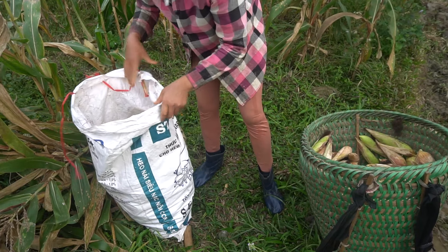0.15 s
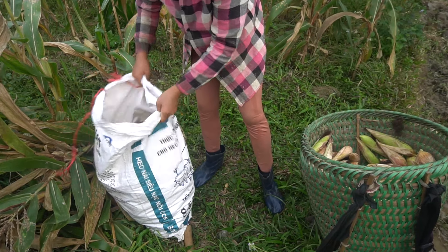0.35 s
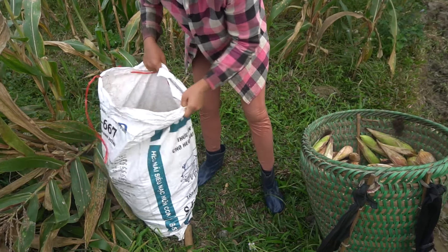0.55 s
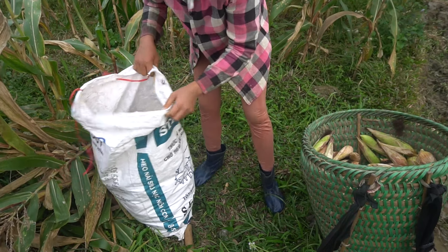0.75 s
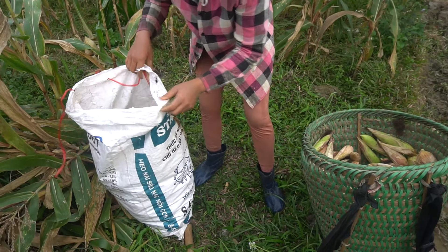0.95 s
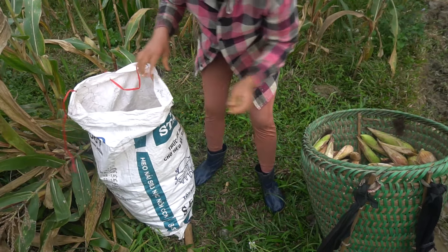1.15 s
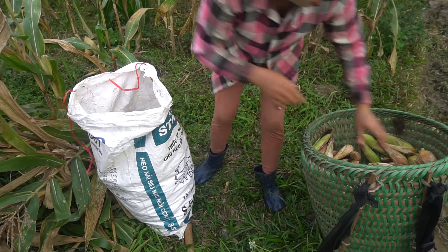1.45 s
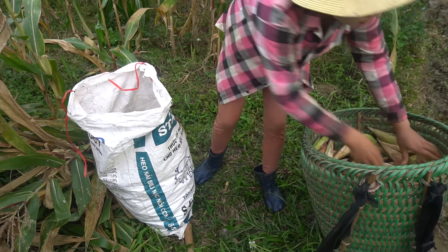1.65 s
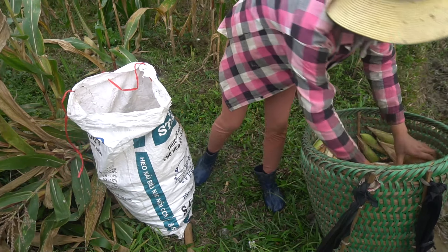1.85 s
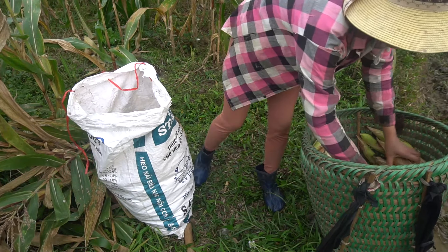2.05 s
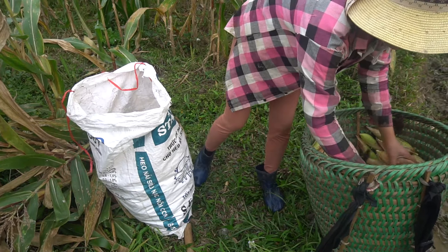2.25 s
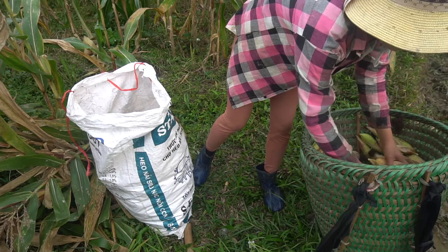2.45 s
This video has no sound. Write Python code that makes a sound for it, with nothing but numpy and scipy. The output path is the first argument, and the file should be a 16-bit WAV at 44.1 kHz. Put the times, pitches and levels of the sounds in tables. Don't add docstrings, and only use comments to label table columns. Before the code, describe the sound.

Crackling of a full woven plastic sack jerked by hands, then corn husks rummaged in a basket

```python
import sys
import numpy as np
from scipy import signal
from scipy.fft import rfft, irfft
from scipy.io import wavfile
from scipy.ndimage import uniform_filter1d

SR = 44100
rng = np.random.default_rng(int(sys.argv[2]) if len(sys.argv) > 2 else 0)


def undo_db(level):
    steps = np.asarray(level, float) / 20
    return 10 ** steps


def file_out(sig):
    cols = np.atleast_2d(sig).T
    lim = np.clip(cols, -1, 1)
    pcm = np.round(lim * 32767).astype(np.int16)
    wavfile.write(sys.argv[1], SR, pcm)


N = 114660

# (peak [s], length [s], weave [dB], walls [dB rel. weave], fizz [dB rel. weave])
TUGS = [(.0, 0.12, -46, 2, 3.5), (0.164, 0.16, -46, -4.5, 1), (0.236, 0.095, -54, -27, 3),
        (0.293, 0.097, -44, -5, -3), (0.335, 0.039, -48.5, -2, 3), (0.399, 0.12, -36, -2, -3),
        (0.437, 0.033, -33, -1, -18), (0.453, 0.093, -26, -14, -28), (0.458, 0.092, -30.5, 3.5, 0.5),
        (0.494, 0.03, -39, 10.5, 4), (0.591, 0.097, -46.5, -6.5, -3.5), (0.65, 0.15, -47, -0.5, 2),
        (0.757, 0.24, -48, -2, 4.5), (0.818, 0.054, -41.5, -8, -3), (0.858, 0.1, -49.5, 2, -16),
        (0.983, 0.073, -60.5, 4.5, 13.5), (1.013, 0.039, -43.5, -6, -3), (1.056, 0.14, -53.5, -9, 2.5),
        (1.141, 0.041, -50, -6.5, 3.5), (1.173, 0.021, -45, -9, -4)]
# (peak [s], length [s], husks [dB], fizz [dB rel. husks])
GRABS = [(1.72, 0.37, -70, 11), (1.803, 0.029, -50.5, -1.5), (1.87, 0.13, -51, 1.5),
         (1.908, 0.037, -47, -10), (1.952, 0.21, -49.5, 1.5), (2.014, 0.095, -42.5, 3.5),
         (2.083, 0.053, -44.5, -0.5), (2.113, 0.14, -49.5, 2), (2.272, 0.15, -47, -1.5),
         (2.336, 0.03, -37, 5.5), (2.343, 0.16, -43.5, -2), (2.402, 0.08, -48.5, 2.5),
         (2.436, 0.063, -48.5, 6), (2.5, 0.32, -54.5, -1.5), (2.595, 0.083, -47.5, 4.5)]
# (time [s], peak [dB], ring [Hz], share of sharp tick [0-1])
SNAPS = [(0.3004, -24.5, 2070, 0), (0.3301, -37.5, 1770, 0), (.3815, -31, 700, 0.3),
         (.3903, -36, 5000, 0.5), (0.3998, -15, 4740, 0.7), (.4075, -25, 920, 0.15),
         (0.422, -10, 1800, 0.37), (0.422, -12, 2900, 0.15), (.4318, -18, 1890, 0.4),
         (.4385, -13, 1920, .4), (0.4435, -9, 1110, 0.47), (.4535, -15, 8500, 0.1),
         (0.4572, -22.5, 1090, 1), (.4608, -10, 895, 0.25), (.4633, -11.5, 787, 0.3),
         (.4665, -25, 7700, .2), (.4712, -18, 1380, .15), (0.4726, -11.5, 7640, 0.06),
         (.4745, -18, 790, 0.78), (.48, -19, 690, 0.5), (.4834, -19, 700, 0.35), (.488, -17, 7800, 0),
         (.4995, -21, 11000, .3), (.5022, -27, 4020, 0.7), (0.5702, -31, 2660, 0.7), (.5955, -31, 1810, .3),
         (.626, -29.5, 2410, 0.2), (.654, -39, 5000, 0.8), (.7515, -31, 2550, .4), (0.8047, -30, 1000, 0.4),
         (0.8101, -28.5, 2300, 0.2), (.8258, -30, 1610, 0.1), (0.8432, -28, 3500, 0.8),
         (0.983, -32, 11100, 0.4), (0.989, -28.5, 9500, 0.3), (1.0087, -26, 1830, 0.6),
         (1.1404, -31, 2360, 0), (1.171, -34, 1900, 0.3), (1.488, -40, 1930, 0.1),
         (1.896, -31.5, 2750, 0.15), (1.9027, -29.5, 2840, 0), (2.08, -32, 2310, .1),
         (2.0887, -33, 2700, 0.4), (2.259, -37, 2170, 0), (2.3195, -30, 1700, 0), (2.333, -25, 1890, 0.06),
         (2.3357, -22, 5530, 0.2), (2.3377, -24, 1950, 0.1), (2.3406, -25, 1900, 0.1),
         (2.3438, -27, 1850, 0.3), (2.596, -34, 3500, 0.2)]
# (time [s], level [dB], left-right [dB])
STRIP_POP = (0.2057, -12, -4)
# (frequency [Hz], level [dB], t60 [s])
STRIP_MODES = [(1780, -14.5, 0.04), (2117, -5, 0.02), (2290, -8.5, 0.011), (2900, 4, 0.007),
               (3710, -3, 0.0065), (4550, 0.5, 0.0059), (5530, -3.5, 0.0049), (8050, -5, 0.0028),
               (10240, -2, 0.0024)]
# (frequency [Hz], level [dB])
POP_TAIL_COLOUR = [(900, -2), (1800, 3), (3000, 6), (6000, -4.5), (12000, -22)]
# (frequency [Hz], level [dB per Hz])
WEAVE_COLOUR = [(200, -42), (500, -5.5), (1000, -5), (1700, -1.5), (3000, -7), (7000, -10.5),
                (16000, -11.5)]
# (frequency [Hz], level [dB per Hz])
HUSK_COLOUR = [(200, -12), (700, -3), (1400, -4), (2200, -0.5), (3200, -3.5), (6000, -7), (13000, -7.5),
               (16000, -11)]
# (frequency [Hz], level [dB])
WEAVE_WIDTH = [(180, -43), (550, -33), (1650, -11), (5000, -1.5), (15000, -12)]
# (frequency [Hz], level [dB])
HUSK_WIDTH = [(180, -14), (600, -5.5), (3000, -7.5), (15000, -3)]
# (frequency [Hz], width [Hz], level [dB])
WALL_MODES = [(61.5, 29, -10.5), (103, 30, -5.5), (147, 23, -5), (262, 36, -3.5), (368, 30, -0.5),
              (420, 84, -3), (640, 72, -2), (746, 61, -4.5), (1060, 150, -7.5)]
# (peak [s], frequency [Hz], level [dB])
PANEL_BOOMS = [(0.161, 624, -44), (0.202, 344, -44.5), (0.207, 651, -45.5), (0.289, 398, -45),
               (0.328, 403, -41), (0.335, 667, -37.5), (0.34, 511, -49), (0.422, 877, -32.5),
               (0.467, 715, -27), (0.479, 366, -21), (0.594, 263, -42.5), (0.608, 333, -59),
               (0.624, 1006, -59), (0.639, 635, -39.5), (0.65, 253, -39.5), (0.649, 398, -39.5),
               (0.679, 495, -46.5), (0.753, 328, -50), (0.807, 1012, -44.5), (0.83, 328, -40)]
# (peak [s], level [dB], frequency [Hz])
KNOCKS = [
    (0.378, -27, 716),
    (0.859, -46, 550),
    (1.863, -47, 896),
    (1.889, -48, 505),
    (1.931, -43.5, 536),
    (1.944, -44, 638),
    (1.959, -48, 727),
    (1.984, -45, 620),
]
# (time [s], level [dB], frequency [Hz])
THUMPS = [
    (.17, -55, 101.7),
    (.31, -53, 87),
    (.4, -51, 100),
    (0.441, -37, 147),
    (.46, -49, 62.8),
    (.725, -55, 127.6),
    (.86, -53, 104.2),
    (.98, -54, 135.4),
    (1.74, -60, 122.3),
]
# (frequency [Hz], level [dB])
LEAF_COLOUR = [(100, -44), (700, -15), (2000, -33), (6000, -7), (14000, -6)]
# (frequency [Hz], share [0-1])
SIDE_BIAS = [(300, 0.), (1200, 0.45), (3000, 0.93)]
# (frequency [Hz], level [dB per Hz])
HUSH_COLOUR = [(15, -42), (25, -6.5), (145, -5.5), (293, -6), (373, -5), (2350, -9), (2690, -10.5),
               (7110, -15), (16000, -25)]
# (frequency [Hz], correlation [-1 to 1])
HUSH_LIKENESS = [(60, 1), (240, 0.28), (950, -0.32), (3770, 0.066), (15000, 0.025)]

BASKET_S = 1.6
SACK_PAN_DB, BASKET_PAN_DB = 1.5, -12.5


def sack():
    slips = clicks(per_s=20000, spread_db=2.0, clump_db=1.4, clump_s=0.0044)
    knocks = clicks(per_s=1800, spread_db=1.5, clump_db=1.5, clump_s=0.01)
    flex = effort(TUGS, column=3)
    slack_drop = 0.059
    taut = 1 - slack_drop * (1 - np.sqrt(flex / flex.max()))
    walls = np.zeros(N)
    for k, (hz, width, db) in enumerate(WALL_MODES):
        walls += (-1) ** k * undo_db(db) * resonate(knocks, hz * taut, width) / np.sqrt(width)
    weave = rustle(slips, WEAVE_COLOUR, WEAVE_WIDTH, TUGS, fizz_column=4, cycles=1.8,
                   pan_db=SACK_PAN_DB, lag_s=-0.000018)
    return weave + placed(flex * evened(walls), pan_db=0.5)


def booms():
    rise_s, fall_s, boom_db, knock_db = 0.0098, 0.015, -2, -8
    t = np.arange(N) / SR
    hits = [(s, hz, db) for s, hz, db in PANEL_BOOMS]
    hits += [(s, hz, db + knock_db) for s, db, hz in KNOCKS]
    shake = 1 + 0.44 * evened(uniform_filter1d(rng.standard_normal(N), size=200))
    out = np.zeros(N)
    for s, hz, db in hits:
        decay = np.where(t < s, ((s - t) / rise_s) ** 2, (t - s) / fall_s)
        out += undo_db(db + boom_db) * np.exp(-decay) * np.sin(2 * np.pi * hz * t)
    return shake * out


def husks():
    slips = clicks(per_s=14000, spread_db=1.0, clump_db=0.9, clump_s=0.0066)
    return rustle(slips, HUSK_COLOUR, HUSK_WIDTH, GRABS, fizz_column=3, cycles=1.5,
                  pan_db=BASKET_PAN_DB, lag_s=0.00005)


def snaps():
    ring_cycles, tick_gain, tick_s, snap_db = 6.7, 1.4, 0.00032, -3
    tick_reach = 1.5
    puff_db, puff_s = -10, 0.026
    on_sack, in_basket = np.zeros((2, N + 2000))
    t = np.arange(2000) / SR
    for s, db, hz, tick in SNAPS:
        noise = rng.standard_normal(2000)
        tick = np.clip(tick, 0, 1)
        puff = evened(resonate(noise, hz, 0.5 * hz))
        puff *= undo_db(puff_db - 60 * t / puff_s * np.sqrt(hz / 2000))
        ring = np.sin(2 * np.pi * hz * t) * np.exp(-3 * t * hz / ring_cycles)
        body = (ring + puff) * np.minimum(t * hz, 1)
        crack = resonate(resonate(noise, hz, tick_reach * hz), hz, tick_reach * hz)
        crack = tick_gain * evened(crack) * np.exp(-t / tick_s)
        place = in_basket if s > BASKET_S else on_sack
        add(place, s, undo_db(db + snap_db) * ((1 - tick) * body + tick * crack))
    return placed(on_sack[:N], SACK_PAN_DB) + placed(in_basket[:N], BASKET_PAN_DB)


def strip_pop():
    tail_db, tail_s, rise_s = -16, 0.07, 0.0004
    out, t = np.zeros(N + 2000), np.arange(2000) / SR
    s, db, pan_db = STRIP_POP
    ring = sum(undo_db(d - 60 * t / t60) * np.sin(2 * np.pi * hz * t) for hz, d, t60 in STRIP_MODES)
    cracks = evened(coloured(rng.standard_normal(2000), POP_TAIL_COLOUR)[:2000])
    pop = ring / 2 + undo_db(tail_db - 60 * t / tail_s) * cracks
    add(out, s, undo_db(db) * pop * np.minimum(t / rise_s, 1) ** 2)
    return placed(out[:N], pan_db)


def thumps():
    push_s = 0.025
    t, out = np.arange(N) / SR, np.zeros(N)
    for s, db, hz in THUMPS:
        u = np.maximum(t - s, 0) / push_s
        out += undo_db(db) * 3 * u * np.exp(-u) * np.sin(2 * np.pi * hz * t)
    return out


def insects():
    band_hz, width_hz, throb_hz, level_db = 6960, 620, 50, -64.5
    throb = 1.5 + np.cos(np.pi * throb_hz * np.arange(N) / SR) ** 2
    near, other = [resonate(resonate(throb * noise, band_hz, width_hz), band_hz, width_hz)
                   for noise in rng.standard_normal((2, N))]
    return undo_db(level_db) * evened(np.array([near, 0.6 * near + 0.8 * other]))


def hush():
    level_db, patch_db = -51, 0.56
    frames, hz = N // 256 + 5, np.fft.rfftfreq(1024, 1 / SR)
    a, b, c, d, patches = rng.standard_normal((frames, 513, 5)).T
    patches = evened(uniform_filter1d(uniform_filter1d(patches, 12, 0), 14, 1))
    same = np.clip(read(HUSH_LIKENESS, hz), -1, 1)[:, None]
    left = a + 1j * b
    right = same * left + np.sqrt(1 - same ** 2) * (c + 1j * d)
    z = np.array([left, right]) * undo_db(read(HUSH_COLOUR, hz)[:, None] + patch_db * patches)
    return undo_db(level_db) * evened(signal.istft(z, nperseg=1024, noverlap=768)[1][:, :N])


def rustle(train, colour, width, rows, fizz_column, cycles, pan_db, lag_s):
    fizz_hz = 4140
    mid = grains(train, 254.7, 17060, cycles, count=24)
    side = coloured(grains(train, 254.7, 17060, cycles, count=24), width)
    hz, sign = np.fft.rfftfreq(N, 1 / SR), np.array([[0.5], [-0.5]])
    z = rfft([mid + side, mid - side])
    z = z * undo_db(read(colour, hz) + sign * pan_db * read(SIDE_BIAS, hz))
    z = z * np.exp(-2j * np.pi * hz * sign * lag_s)
    high = 1 / (1 + (fizz_hz / (hz + 1)) ** 4)
    scale = 1 / np.sqrt(np.mean(irfft(z.mean(0), N) ** 2))
    body = effort(rows) * irfft(z * (1 - high), N)
    fizz = effort(rows, column=fizz_column) * irfft(z * high, N)
    return scale * (body + fizz)


def effort(rows, column=None):
    edge_db, rise_share = -12.5, 0.47
    rows, t = np.array(rows), np.arange(N)[:, None] / SR
    u = (t - rows[:, 0]) / rows[:, 1]
    u = np.where(u < 0, -u / rise_share, u / (1 - rise_share))
    offset_db = 0 if column is None else rows[:, column]
    db = rows[:, 2] + edge_db * u ** 1.3 + offset_db
    return np.sqrt((undo_db(np.maximum(db, -150)) ** 2).sum(axis=1))


def clicks(per_s, spread_db, clump_db, clump_s):
    happens = rng.random(N) < per_s / SR
    size = np.minimum(rng.exponential(1, N), 4)
    sign = rng.choice([-1., 1.], N)
    width = max(int(clump_s * SR), 2)
    clump = evened(uniform_filter1d(uniform_filter1d(rng.standard_normal(N), width), width))
    return evened(sign * undo_db(spread_db * size + clump_db * clump) * happens)


def grains(train, lo_hz, hi_hz, cycles, count):
    patch, out, t = rng.integers(0, count, N), np.zeros(N), np.arange(1200) / SR
    for k, hz in enumerate(np.geomspace(lo_hz, hi_hz, count)):
        ring = np.sin(2 * np.pi * hz * t) * np.exp(-t * hz / cycles)
        ring *= np.sqrt(hz / lo_hz) / np.linalg.norm(ring)
        out += signal.oaconvolve(train * (patch == k), ring)[:N]
    return evened(out)


def placed(x, pan_db):
    scatter_t60_s = 0.02
    hz, t = np.fft.rfftfreq(N, 1 / SR), np.arange(3000) / SR
    direct = irfft(rfft(x) * undo_db(np.outer([0.5, -0.5], pan_db * read(SIDE_BIAS, hz))), N)
    taps = rng.standard_normal((2, 3000)) * (rng.random((2, 3000)) < 0.3)
    taps *= undo_db(-60 * t / scatter_t60_s)
    taps /= np.linalg.norm(taps, axis=1, keepdims=True)
    scatter = [coloured(signal.oaconvolve(d, h)[:N], LEAF_COLOUR) for d, h in zip(direct, taps)]
    return direct + np.array(scatter)


def resonate(x, hz, width):
    turn = np.exp(2j * np.pi * np.cumsum(hz * np.ones(len(x))) / SR)
    r = np.exp(-np.pi * width / SR)
    return 2 * (turn * signal.lfilter([1 - r], [1, -r], x / turn + 1e-18)).real


def coloured(x, points):
    half = read(points, np.fft.rfftfreq(4096, 1 / SR)) * np.log(10) / 20
    full = np.concatenate([half, half[-2:0:-1]])
    taps = np.fft.ifft(np.exp(full - 1j * signal.hilbert(full).imag)).real[:2048]
    return signal.oaconvolve(x, taps)[:N]


def read(points, hz):
    f, value = np.transpose(points)
    return np.interp(np.log(hz + 1), np.log(f + 1), value)


def evened(x):
    return x / np.sqrt(np.mean(x ** 2) + 1e-20)


def add(mix, s, sound):
    start = round(s * SR)
    mix[start:start + len(sound)] += sound


def scene():
    hands = sack() + booms() + husks() + snaps() + strip_pop() + thumps()
    return hands + insects() + hush()


def band_limit(x):
    return signal.sosfilt(signal.butter(12, 15870, fs=SR, output="sos"), x)


def record(dry):
    hz = np.fft.rfftfreq(N, 1 / SR)
    response = (hz < 15800) / np.sqrt(1 + (45 / (hz + 1)) ** 4)
    return band_limit(irfft(rfft(dry) * response, N))


dry = scene()
out = record(dry)
file_out(out)
```